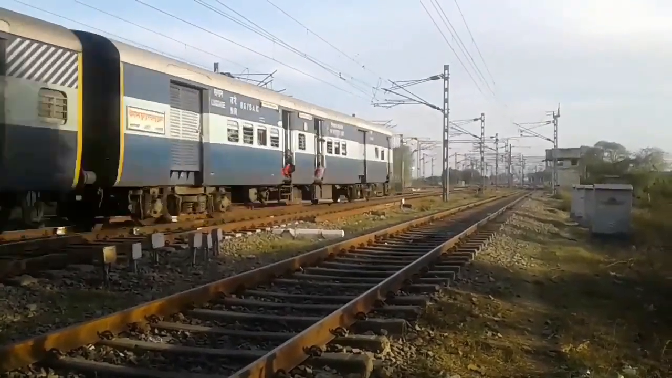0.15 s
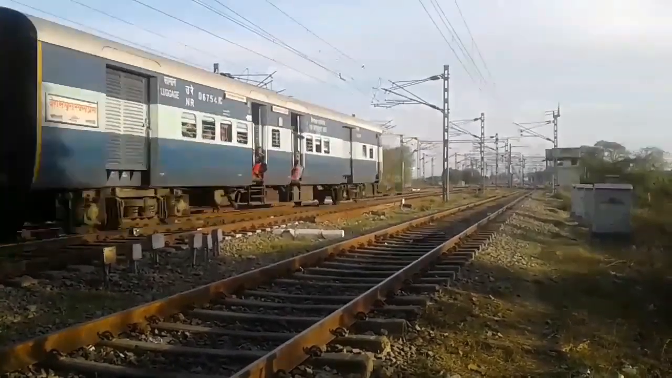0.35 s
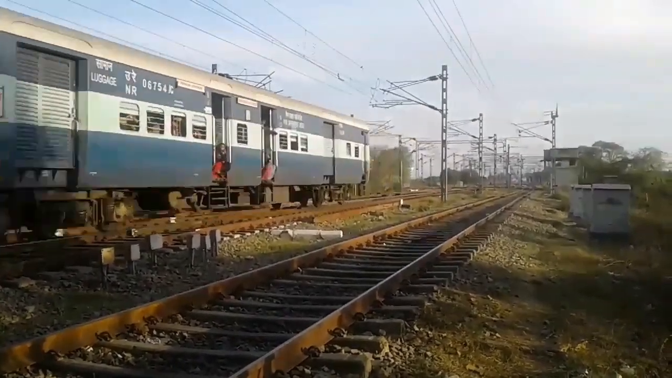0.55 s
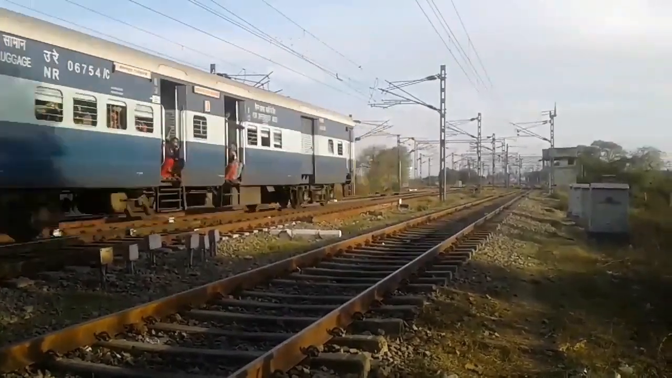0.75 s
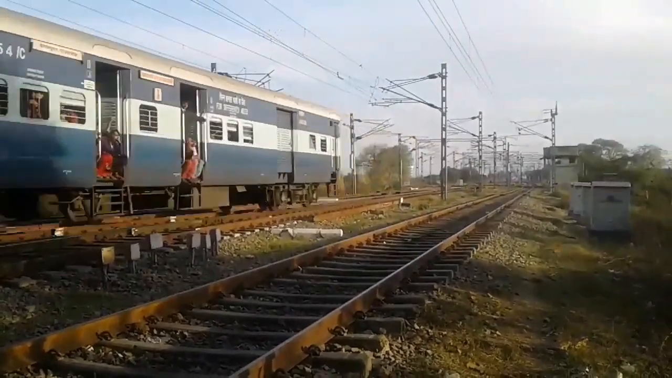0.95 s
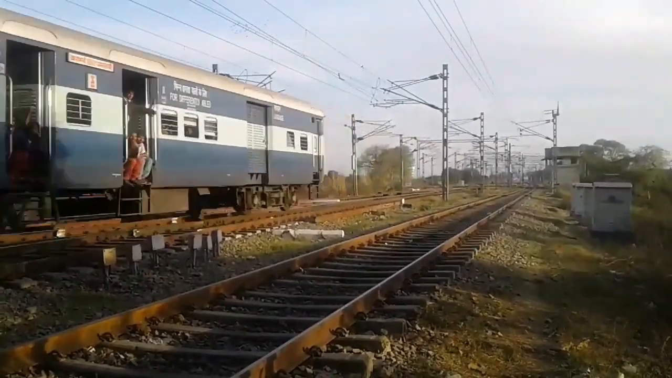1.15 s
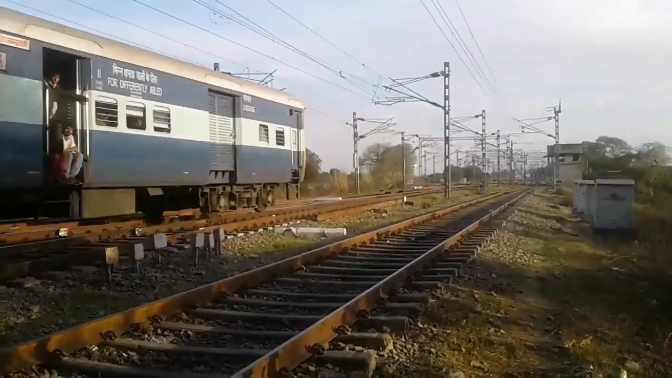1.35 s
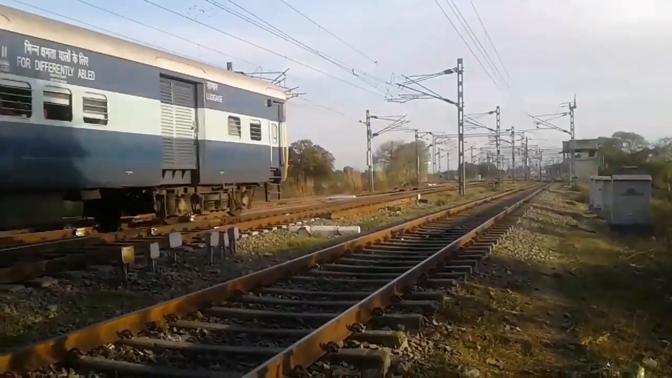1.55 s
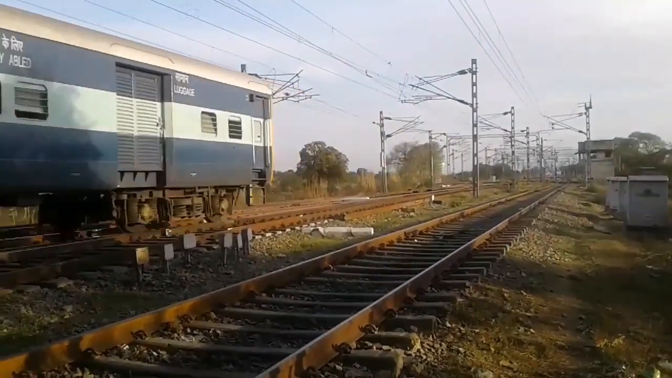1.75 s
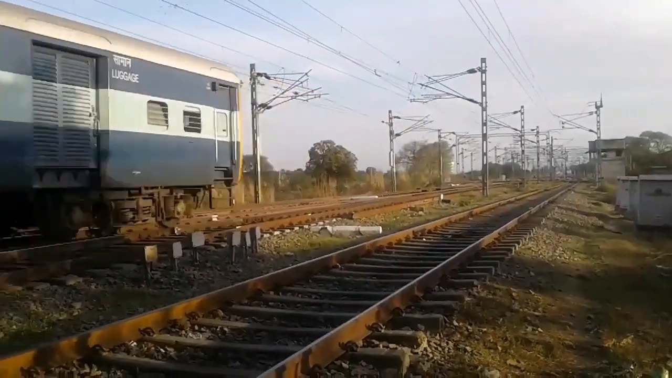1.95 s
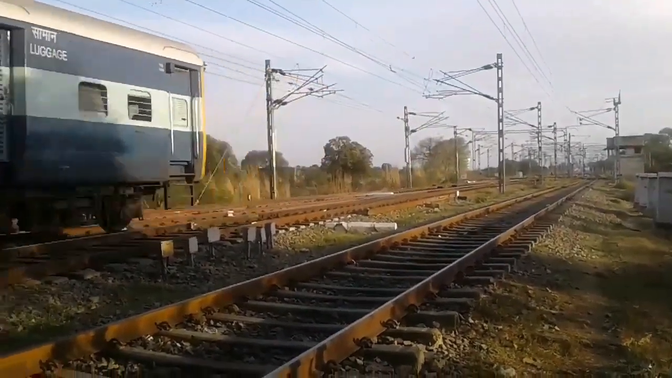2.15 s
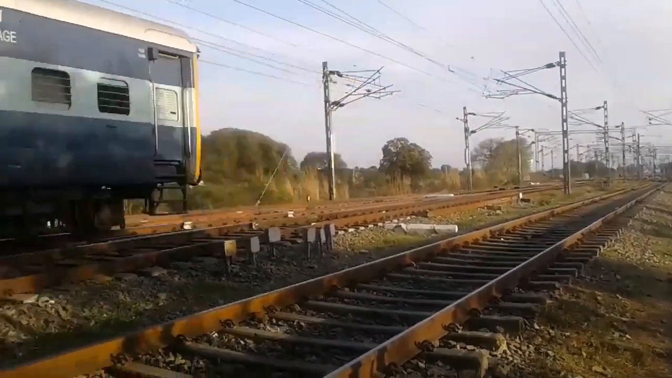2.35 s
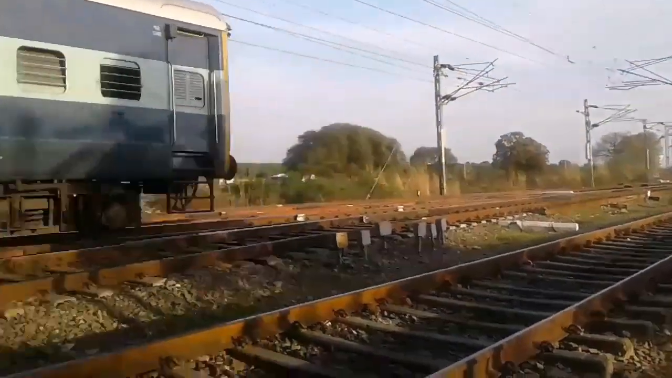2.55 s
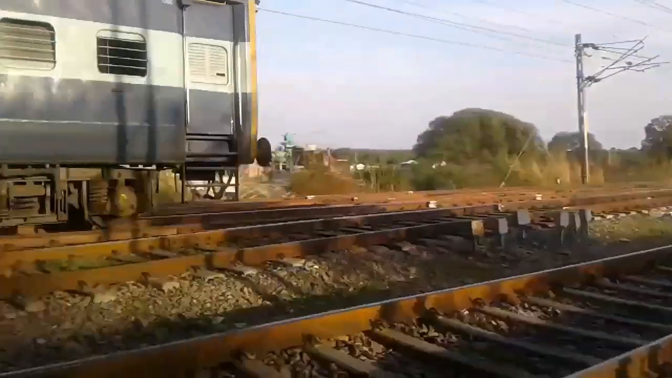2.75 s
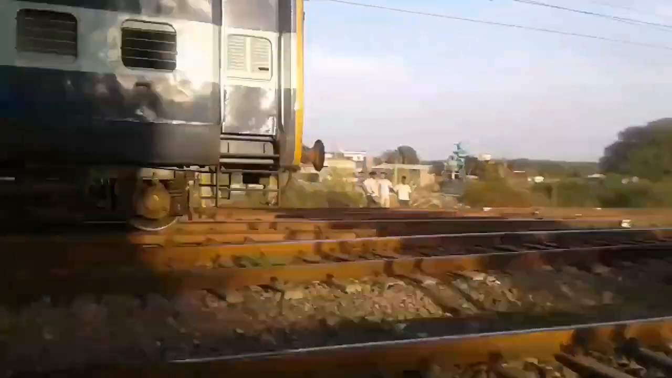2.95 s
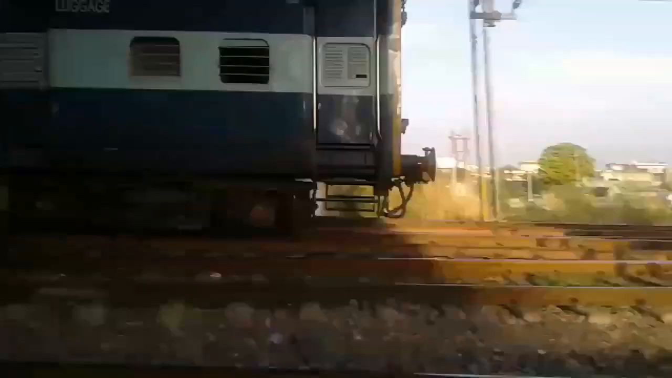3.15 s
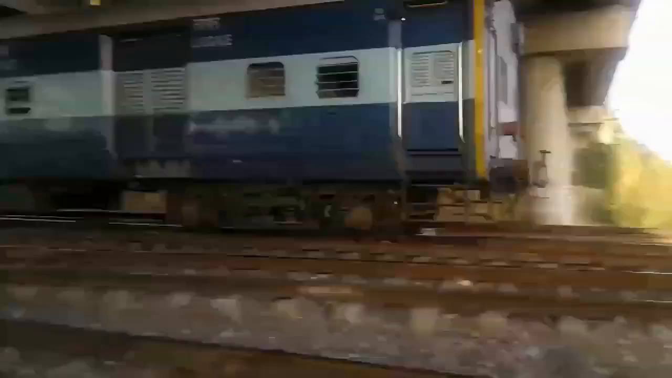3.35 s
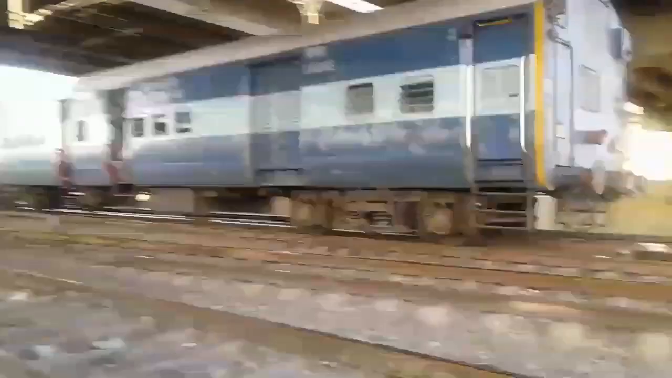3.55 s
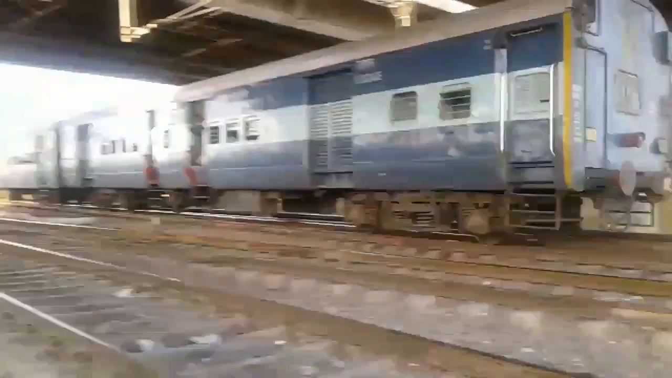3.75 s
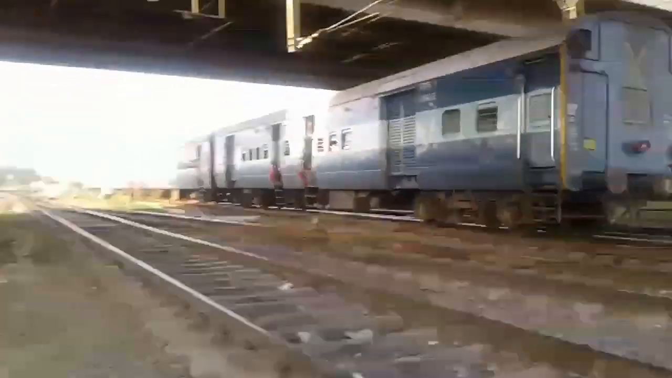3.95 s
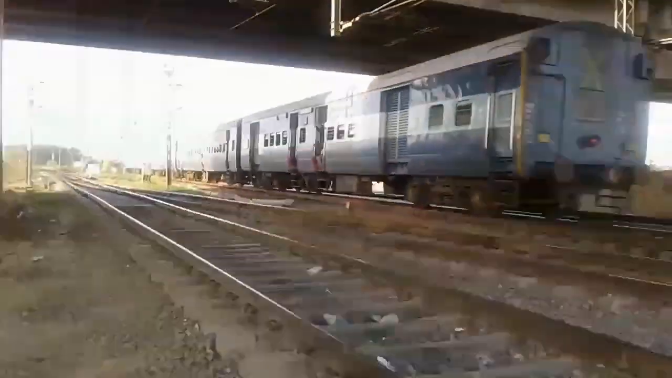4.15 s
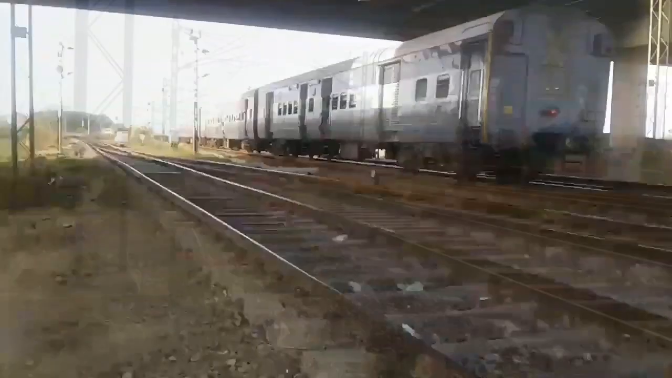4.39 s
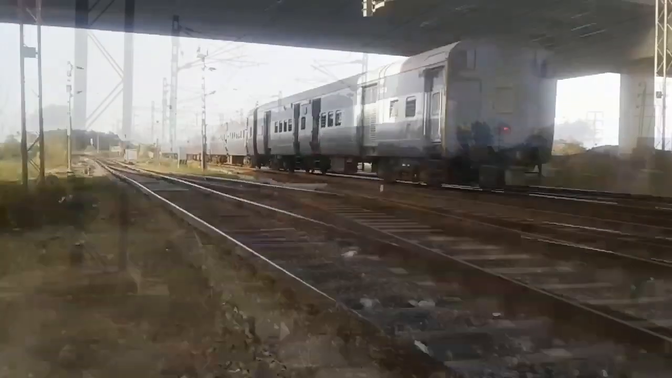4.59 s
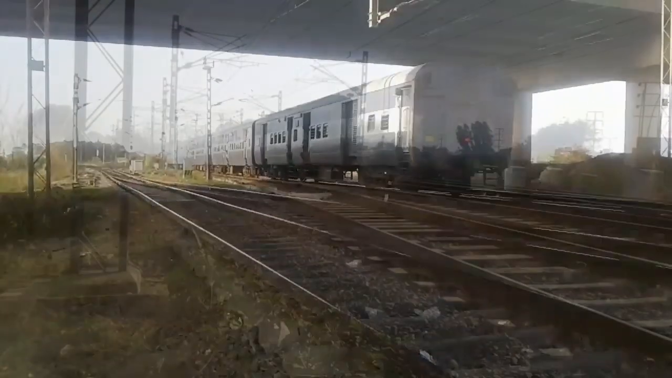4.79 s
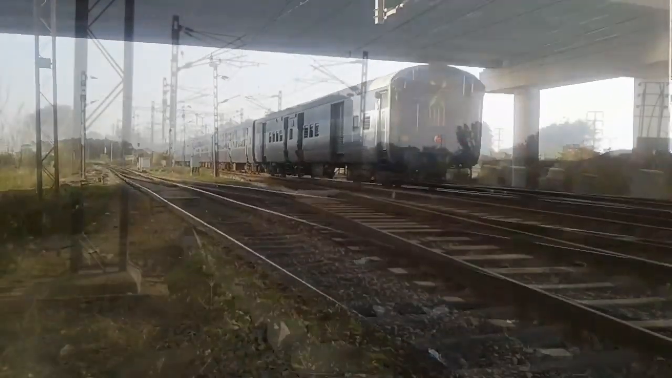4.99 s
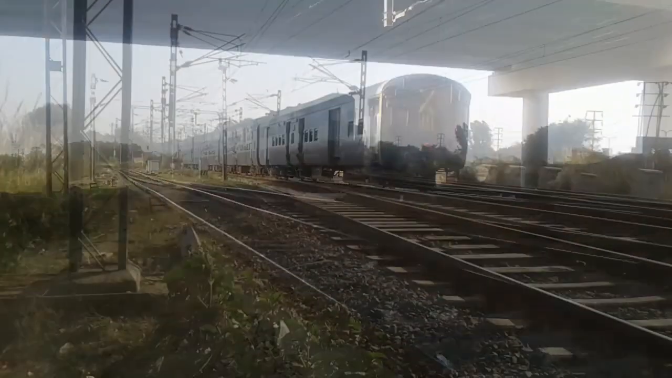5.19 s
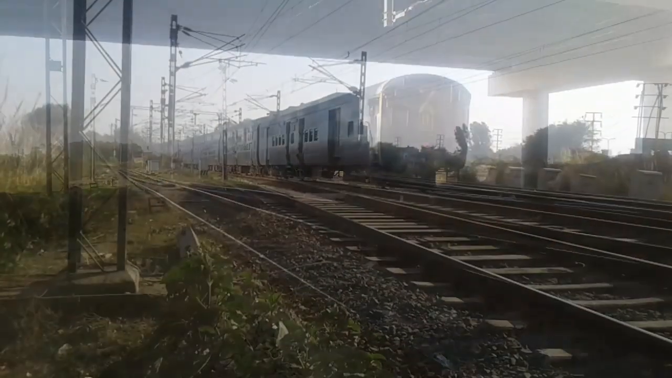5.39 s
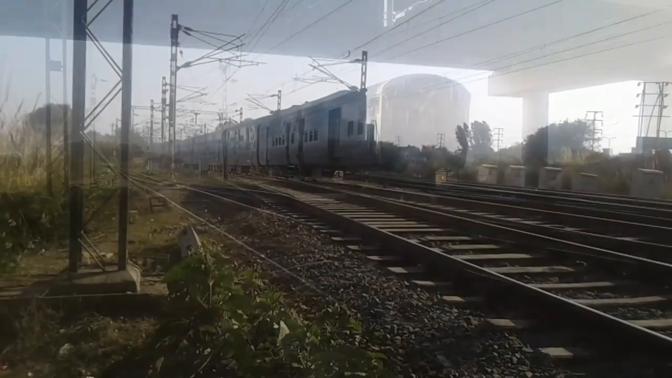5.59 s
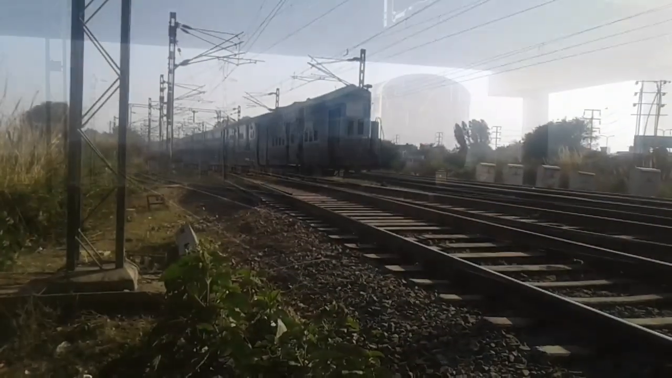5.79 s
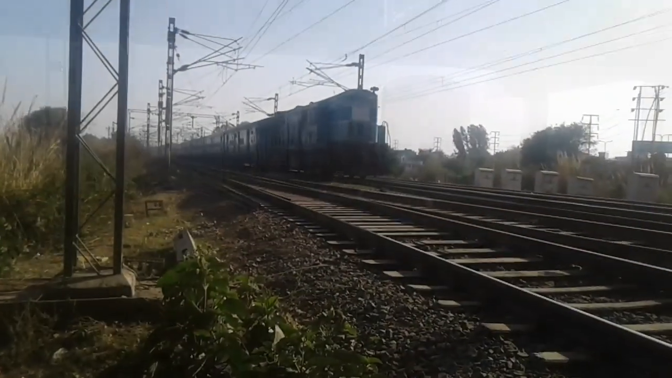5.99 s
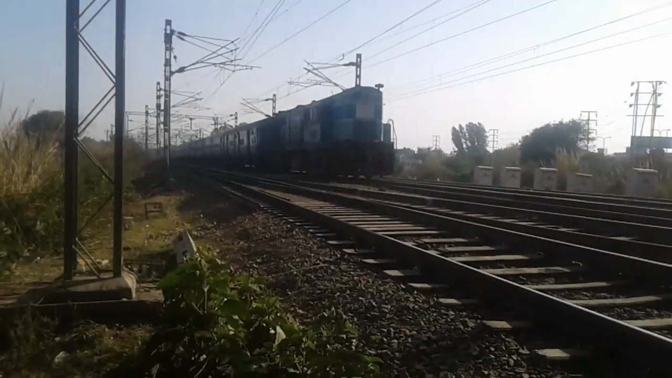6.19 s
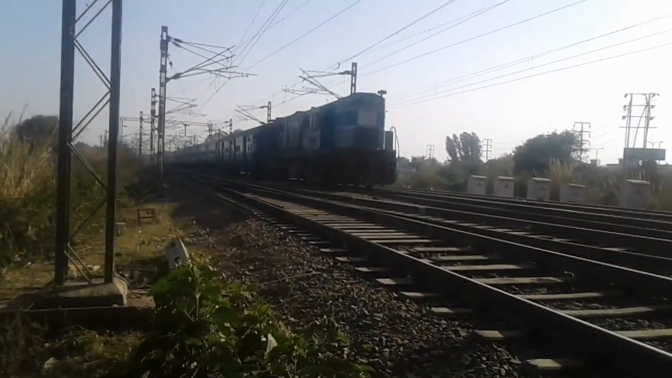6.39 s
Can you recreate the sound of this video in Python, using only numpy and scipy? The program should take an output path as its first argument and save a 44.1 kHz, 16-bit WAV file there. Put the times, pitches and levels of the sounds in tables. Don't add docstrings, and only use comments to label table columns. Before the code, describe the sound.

From the first instant a passenger train rolls close past a phone beside the track. Until about 2.3 s wheels hit a rail gap every 0.05 to 0.3 s: bright cracks, dull knocks, short metallic rings and rattling loose gear, over booming rumble, mid roar and hiss. Flanges brush the rail in short bright scrapes near 0.4, 0.6 and 0.9 s, with a tick at 1.6. After a small gap, heavy blows land at 2.5, 3.3, 3.5, 3.7 and 4.0 s, with a duller one at 2.9; thin squeals sing around 2.9 to 4.2 s, lower near 4.0. From 4.3 s weaker, duller knocks recede over fading rumble. At 5.2 s everything cuts to complete silence. At 5.5 s a distant, muffled train fades in over 0.2 s, slowly growing, with soft smeared clacks at 5.7, 5.9, 6.15 and 6.4 s.

```python
import sys
import numpy as np
from scipy import signal
from scipy.fft import rfft, irfft, next_fast_len
from scipy.io import wavfile
from scipy.ndimage import uniform_filter1d, map_coordinates

SR = 44100
rng = np.random.default_rng(int(sys.argv[2]) if len(sys.argv) > 2 else 0)


def volts_from_db(level):
    exponent = np.asarray(level, float) / 20
    return 10 ** exponent


def log_audio(samples):
    frames = np.atleast_2d(samples).T
    limited = np.clip(frames, -1, 1)
    pcm = np.round(limited * 32767).astype(np.int16)
    wavfile.write(sys.argv[1], SR, pcm)


N = 283557
CUT_S, BACK_S, FADE_IN_S = 5.1958, 5.505, 0.19


def unit(x):
    return x / np.sqrt(np.mean(x ** 2) + 1e-20)


def curves(rows):
    s, *cols = np.transpose(rows)
    return [np.interp(np.arange(N) / SR, s, c) for c in cols]


def wobble(rate_hz):
    knots = rng.standard_normal(int(N * rate_hz / SR) + 4)
    return map_coordinates(knots, [np.arange(N) * rate_hz / SR])


def noise(count, gain):
    m = next_fast_len(count + 2048)
    spectrum = rfft(rng.standard_normal(m)) * gain(np.fft.rfftfreq(m, 1 / SR) + 1)
    return unit(irfft(spectrum, m)[:count])


def shape(points, tilt_db=0):
    f, level = np.transpose(points)
    return lambda hz: volts_from_db(np.interp(np.log(hz), np.log(f), level) + tilt_db * np.log2(hz / 4000))


def patchy(x, depth_db):
    z = signal.stft(x, nperseg=512)[2]
    field = uniform_filter1d(rng.standard_normal(z.shape), size=4, axis=0)
    field = uniform_filter1d(field, size=7, axis=1)
    return unit(signal.istft(z * volts_from_db(depth_db * unit(field)), nperseg=512)[1][:N])


def struck(axles, t60_s, rise_s):
    bright = 1.4
    t = np.arange(N) / SR
    power = 0
    for s, db, crack_db, knock_db, tilt_db in axles:
        since = np.maximum(t - s, 0)
        decay = volts_from_db(db + bright * tilt_db - 60 * since / t60_s)
        power = power + (decay * (1 - np.exp(-since / rise_s))) ** 2
    return np.sqrt(power)


def far_rolling(axles):
    # (frequency [Hz], density [dB per Hz])
    rumble_hz_db = [(15, -43.5), (25, -12.5), (114, -3), (211, -8.5), (236, -11.5), (339, -14.5),
                    (500, -19), (650, -48.5), (1100, -120)]
    # (frequency [Hz], density [dB per Hz])
    roar_hz_db = [(210, -17), (350, 0), (418, -10), (565, -3.5), (721, -6), (872, -6), (1160, -7),
                  (5000, -16.5), (6500, -52), (11000, -120)]
    # (frequency [Hz], density [dB per Hz])
    hiss_hz_db = [(2350, -29), (4000, -9), (4470, -19), (5350, 5.5), (6440, -0.5), (9940, -26),
                  (13900, -38), (16000, -42)]
    # (frequency [Hz], density [dB per Hz])
    sizzle_hz_db = [(5290, -23), (9000, 0), (10000, -16), (14000, -9), (15500, -14), (16000, -27)]
    far_db, gain_db_per_s = -34, 5.5
    roar_db, hiss_db, sizzle_db, struck_db = -2, -18, -48, -23
    level = volts_from_db(far_db + gain_db_per_s * (np.arange(N) / SR - BACK_S - FADE_IN_S))
    swell = 1 + volts_from_db(struck_db + 64) * struck(axles, t60_s=0.3, rise_s=0.027)
    rumble = volts_from_db(0.86 * wobble(8)) * noise(N, shape(rumble_hz_db))
    roar = volts_from_db(roar_db + 0.95 * wobble(25)) * patchy(noise(N, shape(roar_hz_db)), depth_db=0.4)
    hiss = volts_from_db(hiss_db) * swell ** 0.58 * patchy(noise(N, shape(hiss_hz_db)), depth_db=1.5)
    sizzle = volts_from_db(sizzle_db) * swell * noise(N, shape(sizzle_hz_db))
    return level * (rumble + roar + hiss + sizzle)


def rolling(axles):
    # (time [s], underframe shaking [dB], closeness of rolling wheels [dB])
    passing = [(0, -17.5, -23.5), (.33, -17.5, -25), (.42, -13.5, -21.5), (.62, -16, -25.5),
               (1.03, -22.5, -28), (1.15, -14.5, -27.5), (1.35, -19.5, -28), (1.56, -14.5, -27.5),
               (1.78, -17, -23), (2.04, -12.5, -27.5), (2.85, -17, -25), (3.15, -24, -27.5),
               (3.44, -14.5, -23.5), (3.7, -15.5, -26), (4.15, -19.5, -30), (4.27, -26.5, -35.5),
               (4.88, -28.5, -34.5), (4.97, -22.5, -28.5)]
    # (frequency [Hz], density [dB per Hz])
    boom_hz_db = [(40, -62), (95, -19), (130, -2.5), (160, 3.5), (205, -0.5), (249, 1), (384, -5),
                  (461, -11), (700, -24.5), (910, -36), (1540, -120)]
    # (frequency [Hz], density [dB per Hz])
    ground_hz_db = [(15, -58.5), (25, -23.5), (60, -7.5), (85, -6.5), (120, 1), (150, -11.5), (220, -58.5)]
    # (frequency [Hz], density [dB per Hz])
    panels_hz_db = [(180, -40), (228, -8), (255, 1), (290, -0.5), (325, -9.5), (420, -45.5)]
    # (frequency [Hz], density [dB per Hz])
    roar_hz_db = [(240, -26), (400, -9), (461, -1), (723, -6.5), (858, -5.5), (1420, -14.5), (2200, -18.5),
                  (2860, -38.5), (4840, -120)]
    # (frequency [Hz], density [dB per Hz])
    hiss_hz_db = [(880, -21), (1500, -8), (2370, -2.5), (2640, -5), (3590, -9), (3960, -8), (7240, -18.5),
                  (8320, -24), (11000, -32.5), (14900, -34), (16000, -48)]
    # (centre [Hz], width [Hz], level [dB])
    singing = [(5868, 150, -13.5), (7960, 180, -8.5), (8580, 120, -6), (8500, 1200, -1), (11200, 86, -24.5),
               (12400, 200, -23), (13870, 50, -30)]

    tail_db_per_s = -21
    leaving_db = tail_db_per_s * np.maximum(np.arange(N) / SR - passing[-1][0], 0)
    boom_db, near_db = np.array(curves(passing)) + leaving_db
    ground_db = -27 + 0.25 * (boom_db + 14) + 0.75 * (near_db + 25)
    panels_db = -22.5 + 2 * (boom_db + 14.5)
    roar_db = -23.5 + 0.092 * (boom_db + 18.5) + 0.63 * (near_db + 27)
    hiss_db = near_db - 1.5
    webs_db = -45.5 + 2.8 * (near_db + 26)
    webs = volts_from_db(webs_db) + volts_from_db(-27) * struck(axles, t60_s=0.5, rise_s=0.031)

    shake = wobble(28)
    boom = volts_from_db(boom_db + 0.57 * shake) * patchy(noise(N, shape(boom_hz_db)), depth_db=1.5)
    ground = volts_from_db(ground_db) * noise(N, shape(ground_hz_db))
    panels = volts_from_db(panels_db + 0.5 * shake) * noise(N, shape(panels_hz_db))
    roar = volts_from_db(roar_db + 0.17 * shake) * patchy(noise(N, shape(roar_hz_db)), depth_db=2.5)
    hiss = volts_from_db(hiss_db + 0.76 * shake) * patchy(noise(N, shape(hiss_hz_db)), depth_db=1.5)
    sing = 0
    for c_hz, w_hz, db in singing:
        band = noise(N, lambda f: (w_hz * f / np.abs(c_hz ** 2 - f * f + 1j * f * w_hz)) ** 1.8)
        sing = sing + volts_from_db(db + 3 * wobble(11)) * band
    return boom + ground + panels + roar + hiss + webs * sing


def scrapes():
    # (middle [s], length [s], centre [Hz], width [Hz], level [dB rms])
    brushes = [
        (0.437, .1, 3500, 3005, -27),
        (0.583, 0.13, 4200, 3000, -24.5),
        (0.907, 0.13, 4600, 1400, -26.5),
        (1.606, 0.019, 3200, 1500, -22.5),
        (3.316, 0.15, 3800, 2500, -34),
    ]
    t = np.arange(N) / SR
    out = np.zeros(N)
    for s, length_s, c_hz, w_hz, db in brushes:
        swell = np.exp(-((t - s) / (0.5 * length_s)) ** 4)
        out += volts_from_db(db) * swell * noise(N, lambda f: np.exp(-((f - c_hz) / w_hz) ** 2))
    return out


def flanges():
    # (start [s], length [s], frequency [Hz], level [dB rms])
    rubs = [(2.915, .085, 2590, -35), (3.05, .075, 2585, -35), (3.548, .13, 3082, -27.5),
            (3.7, .06, 3072, -36), (3.985, .07, 1688, -27), (4.078, .075, 1686, -25),
            (4.16, .04, 1690, -25), (4.2, .1, 1686, -37), (4.93, .09, 2405, -32), (3.55, .1, 4700, -36),
            (3.265, .07, 2700, -30), (3.27, .06, 3500, -31), (2.24, .14, 8560, -35), (3.66, .1, 5870, -34),
            (3.91, .05, 5870, -36)]
    attack_s, release_t60_s, scatter_rad_per_hz = 0.008, 0.07, 0.9e-5
    out, t = np.zeros(N), np.arange(N) / SR
    for s, length_s, hz, db in rubs:
        release = volts_from_db(-60 * np.maximum(t - s - length_s, 0) / release_t60_s)
        on = np.clip((t - s) / attack_s, 0, 1) * release
        phase = np.cumsum(2 * np.pi * hz / SR + scatter_rad_per_hz * hz * rng.standard_normal(N))
        out += on * volts_from_db(db + 3 + 1.8 * wobble(60)) * np.sin(phase)
    return out


def wheels(rings):
    out, t = np.zeros(N + SR), np.arange(SR) / SR
    for s, modes in rings:
        for hz, db, t60_s in modes:
            waver = np.cumsum(rng.standard_normal(SR)) * 0.014
            load_db = 2.5 * wobble(30)[:SR] * np.clip(t / 0.03, 0, 1)
            fade = np.exp(-(t / (0.53 * t60_s)) ** 3)
            tone = np.sin(2 * np.pi * hz * t + waver)
            out[round(s * SR):][:SR] += volts_from_db(db + load_db - 45 * t / t60_s) * fade * tone
    return out[:N]


def clanks(t, t60_s, count):
    u = rng.random((count, 3))
    since = np.maximum(t - u[:, :1] ** 1.5 * 0.22 * t60_s, 0)
    hz = 1500 * 2.1 ** u[:, 1:2]
    notes = volts_from_db(11 * u[:, 2:] - 60 * since / 0.11) * np.sin(2 * np.pi * hz * since)
    return unit(np.sum(notes, axis=0)[:SR // 6])


def blows(axles, t60_s, smear_s=0):
    # (frequency [Hz], density [dB per Hz])
    rattle_hz_db = [(650, -29), (1100, -3.5), (1470, -0.5), (1630, -2), (2280, 2.5), (3300, -1.5),
                    (4310, -3.5), (5900, -8), (6750, -11.5), (8450, -8.5), (10300, -23.5), (15000, -30.5),
                    (16000, -47)]
    # (frequency [Hz], density [dB per Hz])
    knock_hz_db = [(120, -65.5), (250, -11.5), (600, -6.5), (1100, -11.5), (2000, -27), (4000, -61)]
    out, t = np.zeros(N + SR), np.arange(SR * 3 // 4) / SR
    for s, db, crack_db, knock_db, tilt_db in axles:
        rise_s = smear_s + 0.0003 * volts_from_db(-1.4 * crack_db)
        crack = volts_from_db(crack_db - 60 * t / 0.055) * noise(len(t), shape(rattle_hz_db, tilt_db + 1.5))
        contacts = uniform_filter1d(rng.standard_normal(len(t)), size=180)
        loose = volts_from_db(0.5 * unit(contacts))
        shaking = volts_from_db(-14.0 - 25 * t / t60_s - 60 * (t / (0.64 * t60_s)) ** 2)
        rattle = shaking * unit(loose * noise(len(t), shape(rattle_hz_db, tilt_db)))
        rattle[:SR // 6] += volts_from_db(-22) * clanks(t[:SR // 6], t60_s, count=40)
        knock = volts_from_db(knock_db - 6.0 - 60 * t / 0.5) * (1 - np.exp(-t / 0.0075))
        knock = knock * noise(len(t), shape(knock_hz_db))
        blow = (crack + rattle) * (1 - np.exp(-t / rise_s)) + knock
        out[round(s * SR):][:len(t)] += volts_from_db(db) * blow
    return out[:N]


def scene():
    # (time [s], peak [dB], crack [dB], knock [dB], brightness [dB per octave])
    far_axles = [
        (5.665, -23.5, -10, -7, -6.5),
        (5.93, -16.5, -8, -19, -5.5),
        (6.12, -23, -25, -12, 0),
        (6.155, -21, -14, -16, -2),
        (6.198, -18, -10, -8, -5.5),
        (6.4, -21, -18, -14, -4.5),
    ]
    # (time [s], [(frequency [Hz], starting level [dB peak], t60 [s])])
    far_rings = [
        (5.935, [(2240, -39, 0.33), (2720, -37, 0.24)]),
        (6.15, [(5600, -37, 0.2)]),
    ]
    # (time [s], peak [dB], crack [dB], knock [dB], brightness [dB per
    near_axles = [(0.0746, -9, -9.5, 0.5, -1), (0.1294, -10, -9.5, -13, 3.5), (0.3747, -9, -10, 0, 1),
                  (0.5278, -11.5, -7, -6, 2.5), (0.6484, -13.5, -28, -20, 7), (0.819, -10, -6, 4, 1.5),
                  (1.0944, -9.5, -1, 3, 1.5), (1.376, -10, -2, 2.5, 3), (1.5244, -12, -16, -2.5, 5),
                  (1.5687, -9, -9, -4, -1.5), (1.6791, -14.5, -7, -2, 6), (1.8276, -7, -8, -4, 2),
                  (1.9714, -8, -9, -6.5, 1.5), (2.1091, -8.5, -4, -2, 3.5), (2.2474, -7, -21, -1, 4),
                  (2.54, -7, -15, 1, 3.5), (2.9251, -15, -4, 0, -7.5), (3.261, -6.5, -2.5, -9.5, 2.5),
                  (3.5406, -6, -3.5, -24, 3.5), (3.687, -6, -13, -7.5, 3), (3.7982, -11.5, -15, -15, 4.5),
                  (3.9683, -4.5, -17, -11.5, 2.5), (4.3394, -18, -16, -21, -4),
                  (4.4858, -17.5, -9, -13, -2), (4.6119, -15.5, -20, 0.5, -1), (4.6794, -23.5, -4, 4.5, 1),
                  (4.7686, -18.5, -3.5, -16, -2.5), (4.9255, -14, -14, 3, -0.5)]
    # (time [s], [(frequency [Hz], starting level [dB peak], t60 [s])])
    rings = [(.0746, [(783, -17, 0.21), (1750, -23, 0.16), (2100, -24, .2)]), (.372, [(1920, -15, 0.12),
             (2540, -22.5, .3)]), (.532, [(2000, -21, .25), (2900, -23, .2)]), (.825, [(2350, -22, .3)]),
             (1.094, [(2380, -25, .2), (1960, -31, 0.41), (920, -23, 0.92), (8600, -14.5, 0.073)]),
             (1.524, [(1713, -27, 0.2), (1960, -23.5, .2), (2750, -28, .2)]), (1.971, [(3030, -26, .3)]),
             (3.541, [(2046, -24, .35), (2460, -21, .55), (3811, -29, .6)] ), (3.81, [(8500, -26, 0.29)]),
             (3.688, [(8590, -19.5, 0.21), (7800, -29, 0.36)]), (3.9685, [(1874, -12.5, .18),
             (1910, -18, .1), (2410, -32.5, 0.65), (3125, -35, 0.54)]), (4.0, [(8070, -25, 0.32)]),
             (4.49, [(8500, -50, 0.55), (6170, -47, 0.61)]), (4.679, [(8800, -34, 0.13)]),
             (4.77, [(2300, -31, .3), (5600, -32.5, 0.21), (6230, -39, 0.22)])]

    far = far_rolling(far_axles) + wheels(far_rings)
    far = far + blows(far_axles, t60_s=0.3, smear_s=0.007)
    axles = near_axles
    near = rolling(axles) + scrapes() + flanges() + wheels(rings) + blows(axles, t60_s=0.88)
    t = np.arange(N) / SR
    fade_in = np.clip((t - BACK_S) / FADE_IN_S, 0, 1) ** 1.17
    return (near * (t < CUT_S) + far * fade_in)[None]


def roll_off(x):
    return signal.sosfilt(signal.butter(12, 16680, fs=SR, output="sos"), x)


def record(dry):
    x = signal.sosfilt(signal.butter(2, 45, "high", fs=SR, output="sos"), dry)
    x = x / (1 + np.abs(x / 1.05) ** 6) ** (1 / 6)
    i = np.arange(N)
    x = x * ((i < CUT_S * SR) | (i > BACK_S * SR))
    x = signal.sosfiltfilt(signal.ellip(8, 0.1, 80, 15800, fs=SR, output="sos"), x)
    return roll_off(x)


dry = scene()
out = record(dry)
log_audio(out)
```